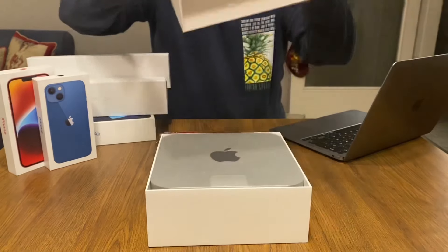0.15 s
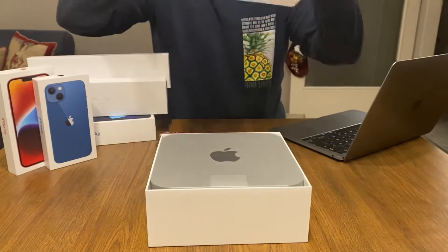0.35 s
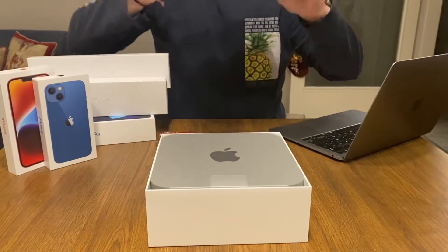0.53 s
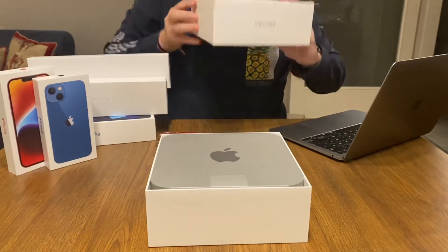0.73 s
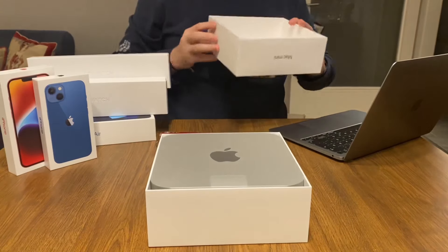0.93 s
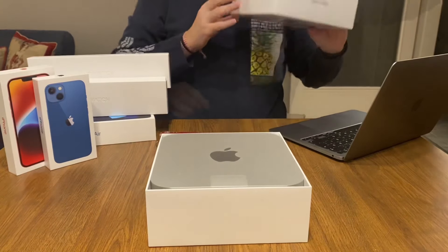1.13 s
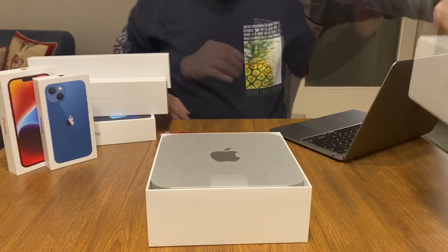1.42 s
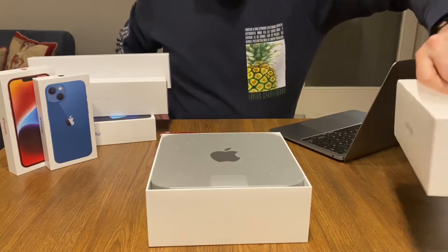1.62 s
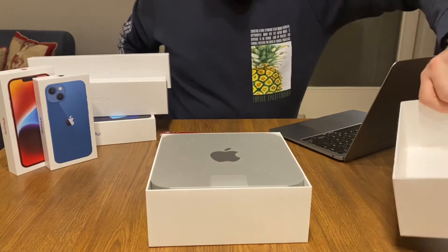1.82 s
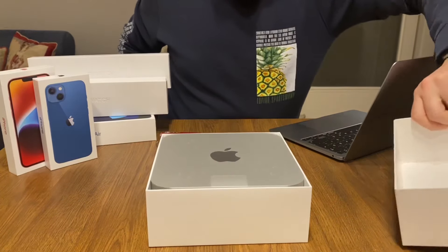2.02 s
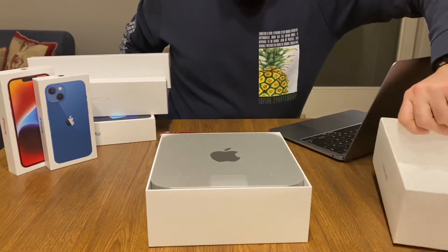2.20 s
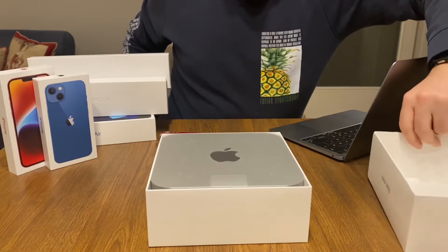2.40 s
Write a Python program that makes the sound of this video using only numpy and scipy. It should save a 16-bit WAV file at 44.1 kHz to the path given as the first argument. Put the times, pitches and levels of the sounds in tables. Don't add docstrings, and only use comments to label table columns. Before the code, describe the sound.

A cardboard box lid is handled, then set on a wooden table with a hollow thunk

```python
import sys
import numpy as np
from scipy import signal
from scipy.fft import rfft, irfft, next_fast_len
from scipy.io import wavfile
from scipy.ndimage import map_coordinates

SR = 44100
rng = np.random.default_rng(int(sys.argv[2]) if len(sys.argv) > 2 else 0)


def int16_out(signal):
    q = np.round(np.clip(np.atleast_2d(signal).T, -1, 1) * 32767)
    wavfile.write(sys.argv[1], SR, q.astype(np.int16))


def boost_factor(decibels):
    exponent = np.asarray(decibels, float) / 20
    return 10 ** exponent


N = 112454

# frequency in Hz, level in dB per Hz.
HUM = [(15, -31), (30, -3.5), (55, 0), (180, -8.5), (1000, -30.5), (3000, -37), (7000, -46.5), (16000, -45)]
# frequency in Hz, likeness 0-1.
ALIKE = [(60, 0.89), (300, 0.58), (800, 0), (3000, 0.57), (6000, 0.28)]
# frequency in Hz, t60 in seconds.
ROOM = [(120, 0.72), (400, 0.38), (1500, 0.41), (5000, 0.42), (12000, 0.4), (14500, 0.058)]

# time in seconds, strength in dB.
SLEEVE = [(0.0, -104), (0.008, -81), (0.066, -76.5), (0.142, -83.5), (0.33, -70), (0.43, -78.5),
          (0.564, -66), (0.73, -77), (0.8, -75.5), (0.87, -72.5), (0.96, -87), (1.014, -74), (1.09, -81.5),
          (1.14, -72), (1.22, -75), (1.274, -66), (1.56, -83.5), (1.59, -77), (1.72, -100)]
# time in seconds, strength in dB.
CUFF_BRUSH = [(0.15, -90), (0.18, -64.5), (0.21, -77), (0.24, -68.5), (0.332, -64), (0.354, -88),
              (0.374, -67), (0.38, -84), (0.42, -81)]
# time in seconds, strength in dB.
GRIP = [(0, -104), (.06, -87.5), (.14, -82), (.23, -65), (.29, -92), (.36, -59.5), (.45, -76), (.8, -72),
        (.97, -73.5), (1.06, -65.5), (1.2, -60), (1.33, -66.5), (1.42, -66.5), (1.52, -70), (1.62, -65),
        (1.7, -68), (1.85, -72), (1.93, -76)]
# time in seconds, strength in dB.
STROKE = [(0.44, -111), (0.46, -83), (0.546, -59.5), (0.68, -62.5), (0.782, -78.5), (0.8, -97)]
# time in seconds, strength in dB.
DRAG = [(2.15, -77), (2.16, -66.5), (2.19, -71), (2.2, -80)]
# time in seconds, strength in dB.
RELEASE = [(2.44, -72), (2.5, -67.5), (2.55, -66.5)]
# frequency in Hz, level in dB per Hz.
CLOTH = [(900, -16), (1500, -37), (3500, -2.5), (7000, -1.5), (11000, -2), (14000, -11.5), (16000, -15)]
CUFF = [(2500, -25), (4200, -10), (5200, -4.5), (7000, 2.5), (11000, 4.5), (14000, -3.5), (16000, 3)]
CARD = [(40, 3), (80, 7.5), (170, 8), (400, -3), (620, 1), (900, -4.5), (2200, -13), (4500, -28)]
PALM = [(300, -17), (500, -9.5), (880, 0.5), (1400, -8.5), (2050, -7), (3300, -13), (4800, -9.5),
        (16000, -30.5)]

# start in seconds, peak in dB, table push in dB, panel touched in Hz.
TAPS = [(0.043, -70, -5, 1900), (0.061, -51.5, -10, 1300), (0.071, -44, -11, 1920), (0.1, -44.5, -6, 550),
        (0.159, -39.5, -9.5, 1130), (0.176, -45, -9, 420), (0.217, -45, -9, 2250), (0.224, -40, -9, 450),
        (0.307, -46.5, -9, 547), (0.323, -41.5, -6, 1110), (0.351, -49.5, -8, 300), (0.366, -43, -4, 1330),
        (0.373, -38.5, -8, 1900), (0.888, -50, -13, 550), (1.054, -46, -18, 547), (1.407, -55, -17, 420),
        (1.919, -51, -21, 1130)]
# frequency in Hz, level in dB, t60 in seconds.
HELD_LID = [(300, 3.5, 0.032), (428.6, 1, 0.039), (558, -8.5, 0.053), (1105, -3.5, 0.022),
            (1340, -6.5, 0.015), (1880, -11, 0.025), (2150, -14, 0.0098)]
# start in seconds, level in dB.
CREAKS = [(1.13, -50), (1.16, -55), (1.19, -48), (1.203, -47.5), (1.216, -47), (1.235, -55), (1.29, -52.5)]
# frequency in Hz, level in dB, t60 in seconds.
FOLD = [(288.5, 4.5, 0.052), (605, 2.5, 0.047), (650, -2, 0.03), (860, -10, 0.025)]
# start in seconds, peak in dB, pitch under the load as a share.
BUMPS = [(0.757, -45.5, 1.044), (0.789, -44, .98), (0.916, -66, 0.57), (1.046, -70, 1.01),
         (1.101, -35, 0.97), (1.144, -44, 0.64), (1.169, -32, .97), (1.2, -44.5, .98), (1.236, -33, 0.925),
         (1.271, -56, .95), (1.312, -51, 0.66), (1.389, -49, 1.03)]
# frequency in Hz, level in dB, t60 in seconds.
LEANED_TABLE = [(98.2, -0.5, 0.16), (116.1, 7.5, 0.16), (150, -26, 0.046), (237, -12, 0.089)]

# start in seconds, peak in dB, table push in dB, left over right in dB.
LANDINGS = [
    (1.604, -50.5, -4.5, -6),
    (1.737, -38, -4.5, -0.5),
    (1.899, -60.5, -26, -9),
    (1.9335, -25.5, 3, 0),
    (2.153, -23.5, 2.5, 1.5),
    (2.194, -4.5, -12, 2),
    (2.297, -9.5, -15, -1.5),
    (2.306, -17.5, -6.5, 6),
    (2.422, -48.5, -16, -1.5),
]
# blow cut-off in Hz, edge crack in dB, crack low edge in Hz,
# panel struck in Hz, panel lag behind the edge in seconds.
HARDNESS = [(895, -22, 1000, 400, 0.00037), (850, -29, 1400, 535, 0.00054), (900, 2, 2000, 320, 0.00033),
            (605, -21, 1200, 500, 0.00071), (563, -26, 1300, 480, 0.00092),
            (1530, -15, 3060, 533, 0.002217), (774, -20, 3640, 590, 0.00125),
            (657, -24, 1900, 430, 0.00096), (710, 6.5, 9100, 460, 0.00048)]
# frequency in Hz, level in dB, t60 in seconds.
LID = [(247.3, -7, 0.064), (297.4, -1.5, 0.06), (359, -2, 0.053), (413, -1.5, 0.025), (458, -5, 0.084),
       (558.7, -1, 0.063), (687, -12, 0.042), (691, -5, 0.048), (780, -20, 0.057), (837, -2.5, 0.06),
       (915, -3.5, 0.071), (1113, -7, 0.052), (1288, 8.5, 0.025), (1523, 4, 0.018)]
# frequency in Hz, level in dB, t60 in seconds.
TABLE = [(91.7, -21.5, 0.32), (111.8, -16.5, 0.32), (116.4, -4, 0.56), (127, -3.5, 0.37), (143, 1, 0.19),
         (189.7, -3.5, 0.12), (244.8, -6, 0.21), (284, -10.5, .2)]
# frequency in Hz, level in dB per Hz.
CRACK = [(1500, 0), (2400, 23), (3300, 11.5), (5500, 1), (9000, 1), (12500, -9.5), (16500, -24)]
SLAP = [(200, -14), (350, -5.5), (750, -7), (1650, -6), (2400, -12), (3500, -16), (6000, -29)]

# frequency in Hz, phase in radians.
HIT_LEAD = [(100, 0.25), (350, 0.67), (700, 1), (1400, 1.2), (6000, 0.81)]
# frequency in Hz, left over right in dB.
HIT_LEFT_DB = [(100, -2), (350, -0.5), (900, -7), (1500, -1.5), (2500, -2), (6000, 16.5)]
# frequency in Hz, left over right in dB.
LEFT_DB = [(60, 1.3), (300, 3), (1500, 1.9), (5000, 6.3), (7000, 2.7)]
# frequency in Hz, half turns.
TURNS = [(6300, -.06), (7600, .06), (8350, .94), (9600, 1.06), (10400, 1.94), (11700, 2.06), (12700, 2.94),
         (13800, 3.06), (14500, 4)]

HUM_DB, CLOTH_DB, CUFF_DB, CARD_DB, PALM_DB = -58, 3.5, 7, 4, 3.5
ROOM_DB, ROOM_GAP_S, ROOM_MONO_HZ = -7, 0.001963, 200
RISE_CYCLES, STRUCK_DB, STRUCK_OCTAVES = 0.34, 8.5, 0.37
TAP_DB, NAIL_DB, NAIL_HZ, NAIL_T60_S = -7.5, -16.5, 2490, 0.0089
BUMP_RISE_S, TABLE_RISE_S = 0.0039, 0.0037
LID_DB, SLAP_DB, SLAP_T60_S, EDGE_T60_S = -6.5, -5.5, 0.06, 0.012
ECHO_SLAP_DB, ECHO_EDGE_DB, ECHO_LID_DB = 25, 15.5, -4.5
SQUEEZE_S, SQUEEZE_T60_S, SQUEEZE_HZ, SQUEEZE_DB = 2.194, 0.04, 1000, -27
MERGE_HZ, MERGE_WIDTH_HZ, TOP_HZ, LIMIT = 6300, 250, 15900, 0.9


def unit(x):
    return x / np.sqrt(np.mean(x ** 2) + 1e-20)


def along(points, hz):
    f, v = np.transpose(points)
    return np.interp(np.log(hz + 1), np.log(f + 1), v)


def curve(rows):
    s, v = np.transpose(rows)
    return np.interp(np.arange(N) / SR, s, v, left=-120, right=-120)


def wobble(rate):
    knots = rng.standard_normal(int(N * rate / SR) + 4)
    return map_coordinates(knots, [np.arange(N) * rate / SR])


def filtered(x, response):
    m = next_fast_len(x.shape[-1] + 8192)
    spectrum = rfft(x, m) * response(np.fft.rfftfreq(m, 1 / SR))
    return irfft(spectrum, m)[..., :x.shape[-1]]


def add(track, s, sound):
    part = track[..., round(s * SR):][..., :sound.shape[-1]]
    part += sound[..., :part.shape[-1]]


def rush(spectrum, grain_db):
    angle = lambda hz: np.arccos(np.clip(along(ALIKE, hz), 0, 1)) / 2
    mid_side = lambda hz: boost_factor(along(spectrum, hz)) * [np.cos(angle(hz)), np.sin(angle(hz))]
    pair = rng.standard_normal((2, N)) * boost_factor(grain_db * wobble(280))
    mid, side = filtered(pair, mid_side)
    return unit(np.array([mid + side, mid - side]))


def burst(response, t60):
    t = np.arange(SR // 10) / SR
    noise = unit(filtered(rng.standard_normal(len(t)), response))
    return boost_factor(-60 * t / t60) * (1 - np.exp(-t / 0.00013)) * noise


def ring(modes, rise_s=0, t60_share=1, top_hz=20000, loose=1, struck_hz=500, struck_db=0):
    hz, db, t60 = np.transpose(modes)[..., None]
    t60 = t60 * t60_share
    t = np.arange(int(SR * min(0.5, t60.max()))) / SR
    scatter_db = rng.normal(0, 1.5, hz.shape)
    near_db = struck_db * np.exp(-(np.log2(hz / struck_hz) / STRUCK_OCTAVES) ** 2)
    gain = boost_factor(db + scatter_db + near_db - 60 * t / t60) / (1 + (hz / top_hz) ** 4)
    rise = (1 - np.exp(-t / (rise_s + RISE_CYCLES / hz))) ** 2
    phase = loose * rng.random(hz.shape)
    return np.sum(gain * rise * np.sin(2 * np.pi * (hz * t + phase)), axis=0)


def room_hum():
    return boost_factor(HUM_DB + 0.48 * wobble(4.96)) * rush(HUM, grain_db=3.0)


def room(x):
    hz, t, z = signal.stft(rng.standard_normal((2, SR // 2)), SR, nperseg=256)
    tail = signal.istft(z * boost_factor(-60 * t / along(ROOM, hz)[:, None]), SR, nperseg=256)[1]
    apart = filtered((tail[0] - tail[1]) / 2, lambda f: 1 / (1 + (ROOM_MONO_HZ / (f + 1)) ** 2))
    tail = tail.mean(axis=0) + np.array([apart, -apart])
    late = np.pad(x, (round(ROOM_GAP_S * SR), 0))[None]
    return boost_factor(ROOM_DB) * signal.fftconvolve(late, tail / np.linalg.norm(tail[0]), axes=1)


def rubbing():
    sleeve = boost_factor(curve(SLEEVE) + CLOTH_DB + 0.63 * wobble(29.5)) * rush(CLOTH, grain_db=1.5)
    cuff = boost_factor(curve(CUFF_BRUSH) + CUFF_DB + 1.3 * wobble(40.8)) * rush(CUFF, grain_db=2.0)
    creep = boost_factor(curve(GRIP) + CARD_DB + 1.14 * wobble(44.06)) * rush(CARD, grain_db=0.5)
    slide_db = np.max([curve(STROKE), curve(DRAG), curve(RELEASE)], axis=0)
    palm = boost_factor(slide_db + PALM_DB + 1.3 * wobble(37.6)) * rush(PALM, grain_db=0.0)
    return sleeve + cuff + creep + palm


def forearm_bumps():
    out = np.zeros((2, N))
    for s, db, pitch_share in BUMPS:
        modes = np.multiply(LEANED_TABLE, [pitch_share, 1, 1])
        add(out, s, boost_factor(db) * ring(modes, BUMP_RISE_S, loose=0.1))
    return out


def fold_creaks():
    out = np.zeros((2, N))
    for s, db in CREAKS:
        add(out, s, boost_factor(db) * ring(FOLD, rise_s=0.0018))
    return out


def finger_taps():
    table, taps = np.zeros((2, N)), np.zeros(N)
    nail = lambda hz: 1 / (1 + (NAIL_HZ / (hz + 1)) ** 2) / (1 + (hz / 6000) ** 2)
    for s, db, push_db, struck_hz in TAPS:
        lid = ring(HELD_LID, rise_s=0.001, struck_hz=struck_hz, struck_db=5.5)
        add(taps, s, boost_factor(db + TAP_DB) * lid)
        add(taps, s, boost_factor(db + NAIL_DB) * burst(nail, NAIL_T60_S))
        add(table, s, boost_factor(db + push_db) * ring(TABLE, t60_share=0.39))
    return table + taps + boost_factor(-0.5) * room(taps)[:, :N]


def placed(x, pan_db):
    half = np.array([[0.5], [-0.5]])
    port = lambda hz: np.exp(-1j * along(HIT_LEAD, hz) * half) * boost_factor(along(HIT_LEFT_DB, hz) * half)
    return boost_factor(pan_db * half) * filtered(np.array([x, x]), port)


def pulse(response):
    click = filtered(np.arange(SR // 10) == 200, response)
    return click / np.linalg.norm(click)


def air_puff():
    band = lambda hz: 1 / (1 + ((hz - SQUEEZE_HZ) / 300) ** 4)
    puff = burst(band, SQUEEZE_T60_S)[::-1]
    return boost_factor(SQUEEZE_DB) * placed(puff, 0)


def landings():
    out = np.zeros((2, N))
    for (s, db, push_db, pan_db), hardness in zip(LANDINGS, HARDNESS):
        hard_hz, crack_db, edge_hz, struck_hz, lag_s = hardness
        sharp = lambda hz: boost_factor(along(CRACK, hz)) / (1 + (edge_hz / (hz + 1)) ** 6)
        dull = lambda hz: boost_factor(along(SLAP, hz)) / (1 + (hz / hard_hz) ** 3.56)
        lid = ring(LID, top_hz=hard_hz, loose=0.15, struck_hz=struck_hz, struck_db=STRUCK_DB)
        lid = boost_factor(db + LID_DB) * lid
        air = np.pad(boost_factor(db + crack_db) * burst(sharp, EDGE_T60_S), (0, SR // 10))
        add(air, lag_s, boost_factor(db + SLAP_DB) * burst(dull, SLAP_T60_S))
        add(air, lag_s, lid)
        wood = boost_factor(db + push_db) * ring(TABLE, TABLE_RISE_S, loose=0.2)
        wood = wood * boost_factor(1.2 * wobble(25)[:len(wood)])
        add(out, s, placed(air, pan_db))
        add(out, s, wood)
        spread = boost_factor(-12) * wood
        slap_echo = boost_factor(db + SLAP_DB + ECHO_SLAP_DB) * pulse(dull)
        edge_echo = boost_factor(db + crack_db + ECHO_EDGE_DB) * pulse(sharp)
        add(spread, 0, slap_echo + edge_echo)
        add(spread, 0, boost_factor(ECHO_LID_DB) * lid)
        add(out, s, room(spread))
    add(out, SQUEEZE_S - 1 / 10, air_puff())
    return out


def scene():
    hands = forearm_bumps() + fold_creaks() + finger_taps()
    return room_hum() + rubbing() + hands + landings()


def top_cut(x):
    return signal.sosfilt(signal.butter(12, 16830, fs=SR, output="sos"), x)


def record(dry):
    side = np.array([[-1], [1]])
    upper = lambda hz: 0.5 + 0.5 * np.tanh((hz - MERGE_HZ) / MERGE_WIDTH_HZ)
    balance = lambda hz: (1 - upper(hz)) * boost_factor(-side * along(LEFT_DB, hz) / 2)
    turning = lambda hz: np.exp(0.5j * np.pi * side * along(TURNS, hz))
    spin = lambda hz: upper(hz) / (1 + (hz / TOP_HZ) ** 60) * turning(hz)
    low = filtered(dry, balance)
    high = filtered(np.array([dry[0], dry[0]]), spin)
    both = low + high
    limited = both / (1 + np.abs(both / LIMIT) ** 6) ** (1 / 6)
    return top_cut(limited)


dry = scene()
out = record(dry)
int16_out(out)
```